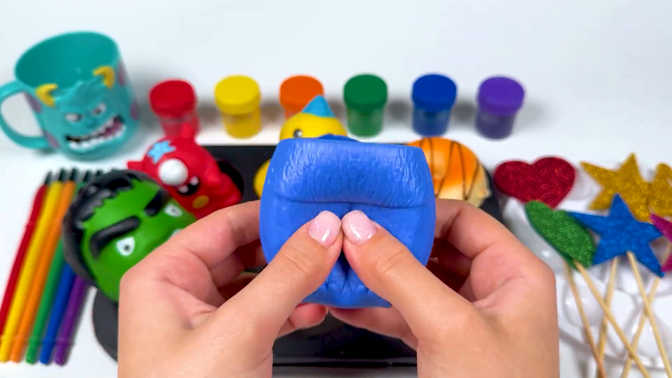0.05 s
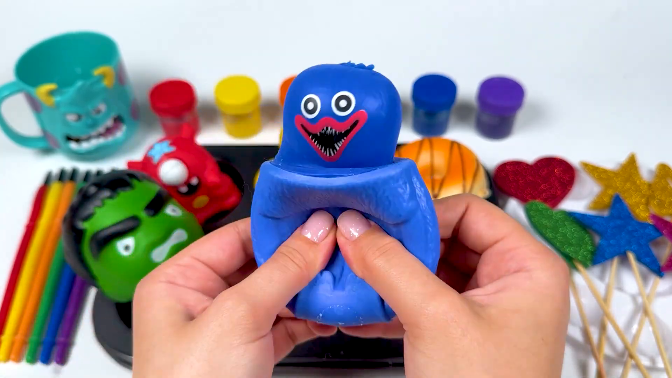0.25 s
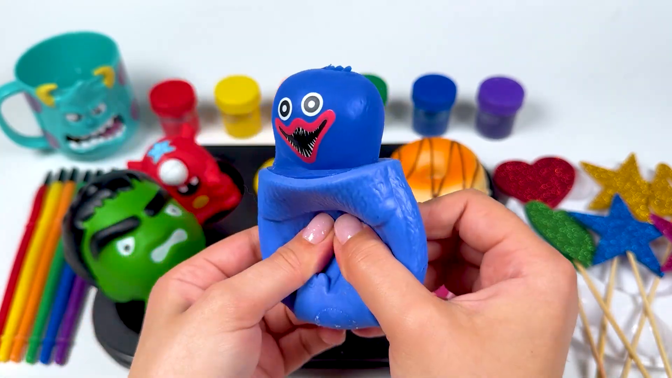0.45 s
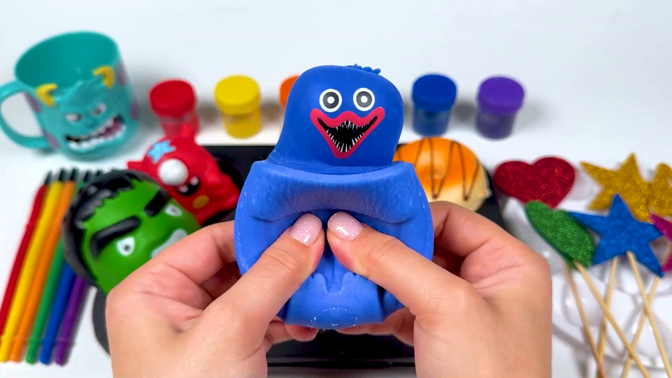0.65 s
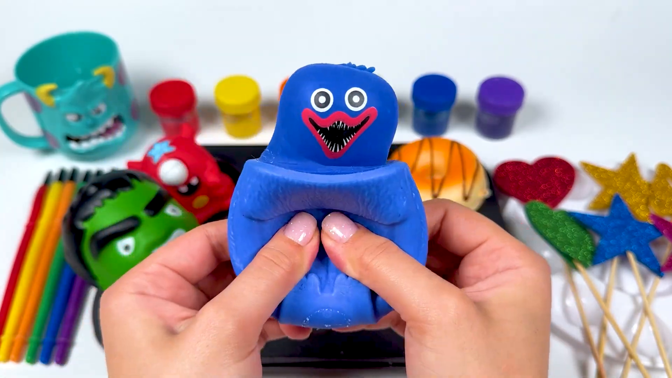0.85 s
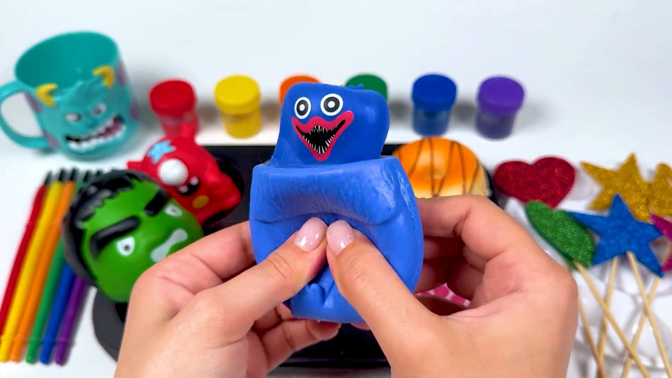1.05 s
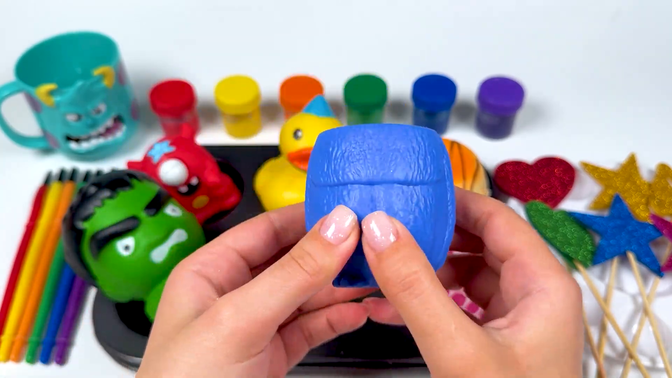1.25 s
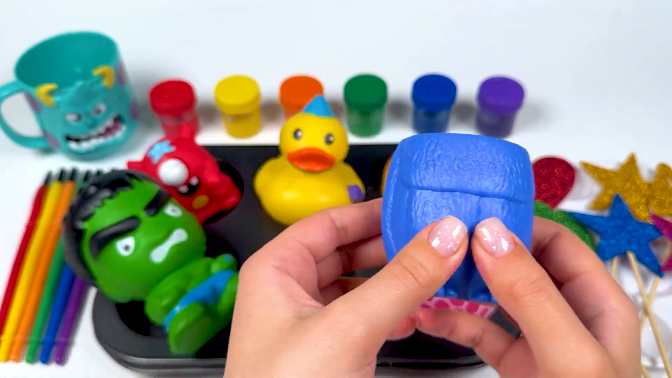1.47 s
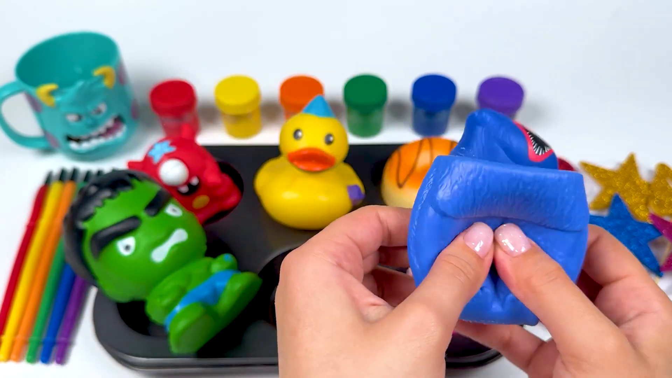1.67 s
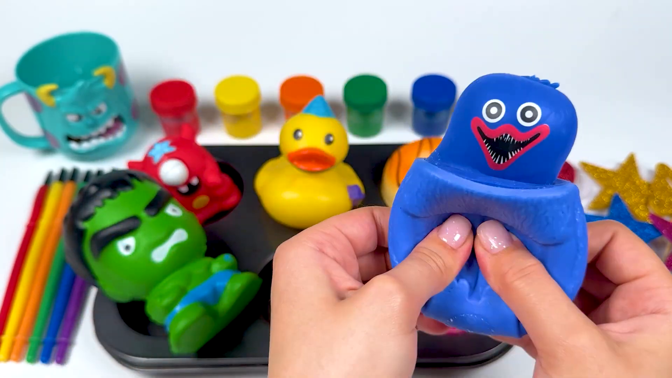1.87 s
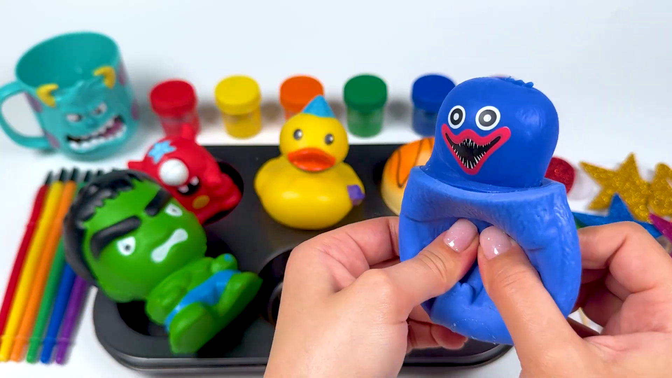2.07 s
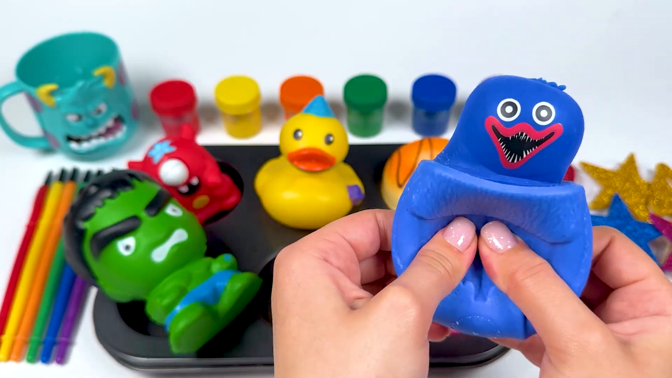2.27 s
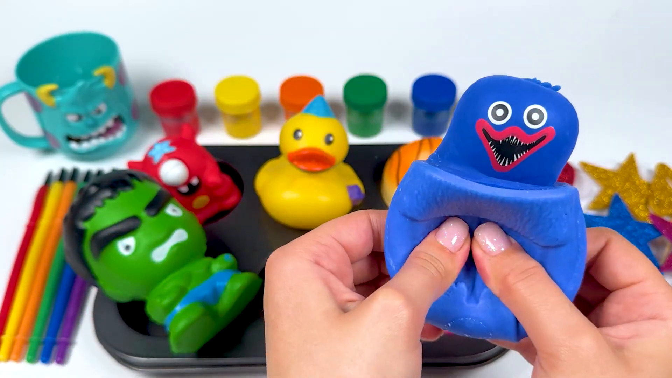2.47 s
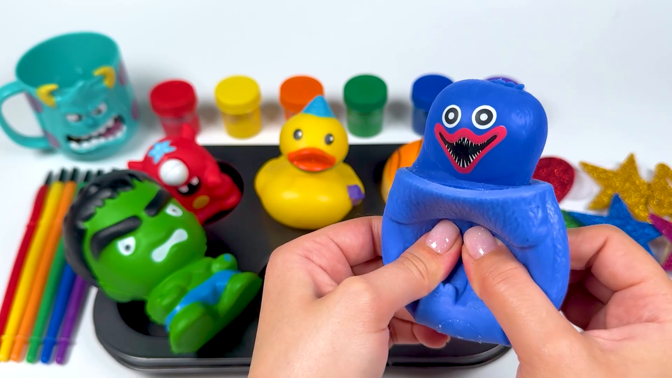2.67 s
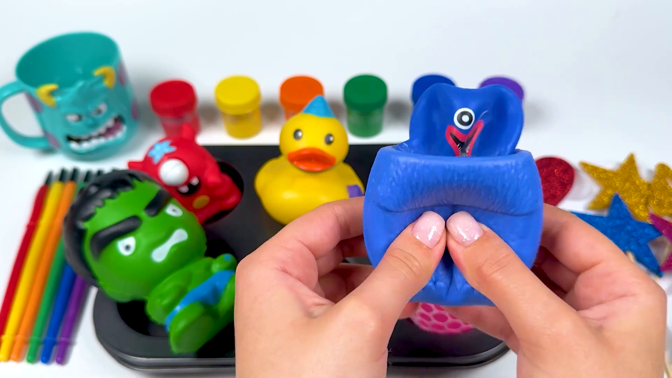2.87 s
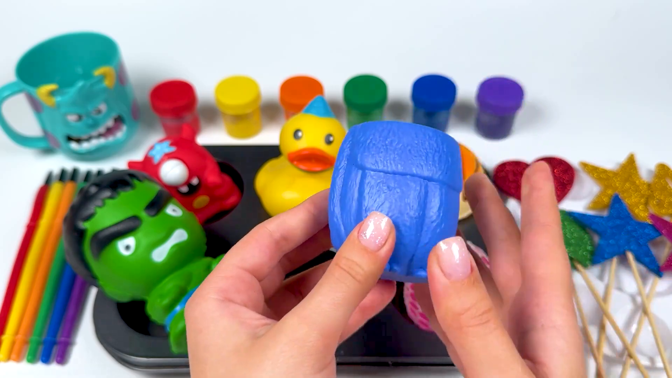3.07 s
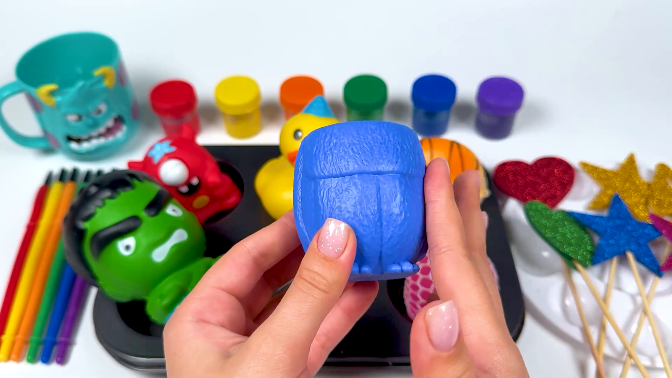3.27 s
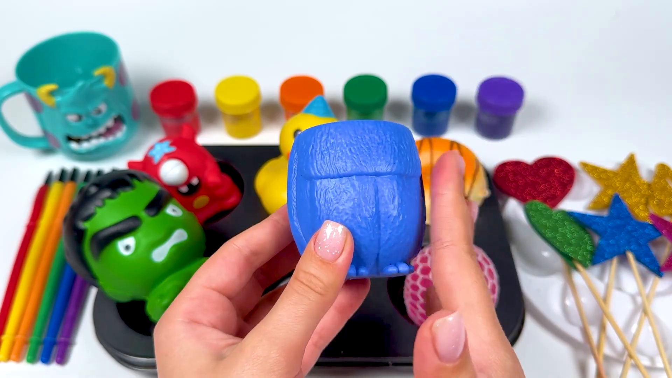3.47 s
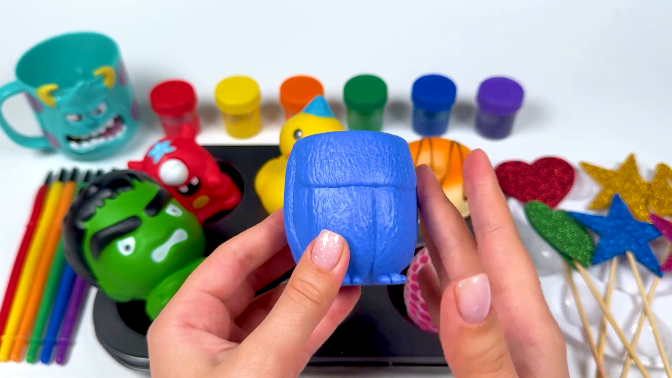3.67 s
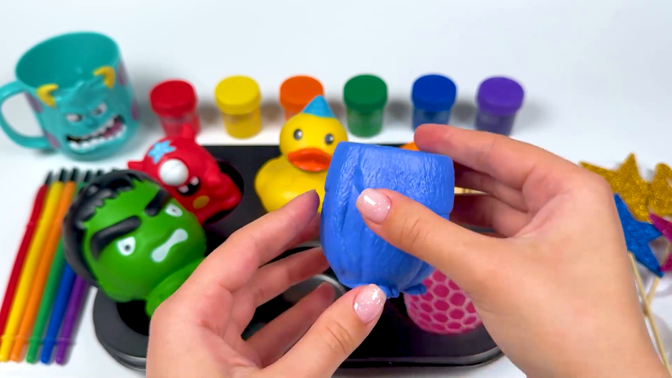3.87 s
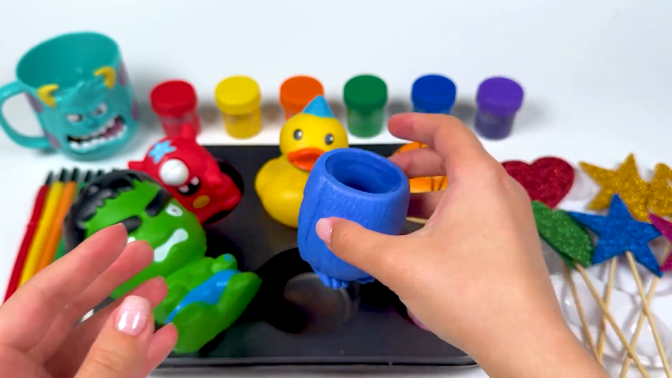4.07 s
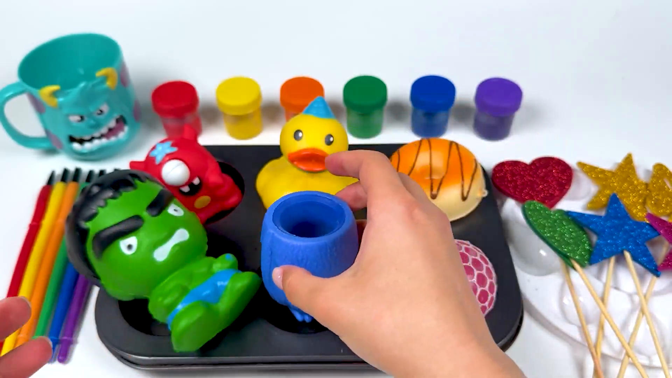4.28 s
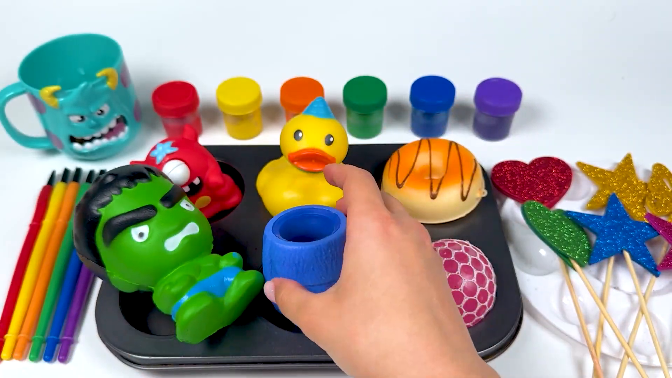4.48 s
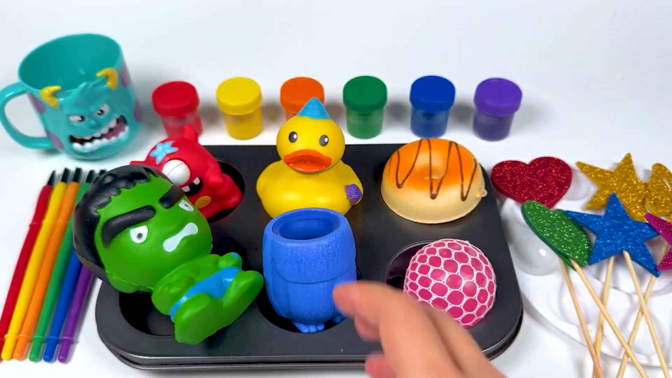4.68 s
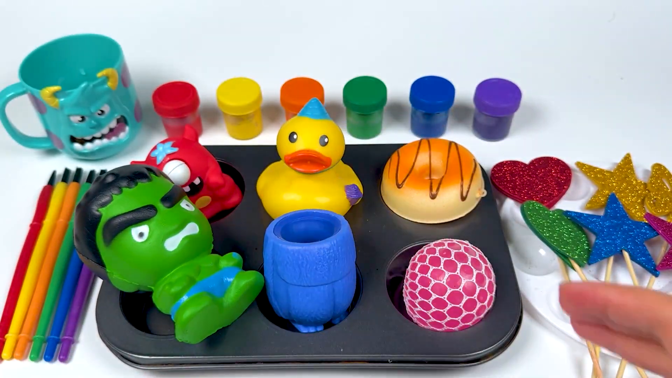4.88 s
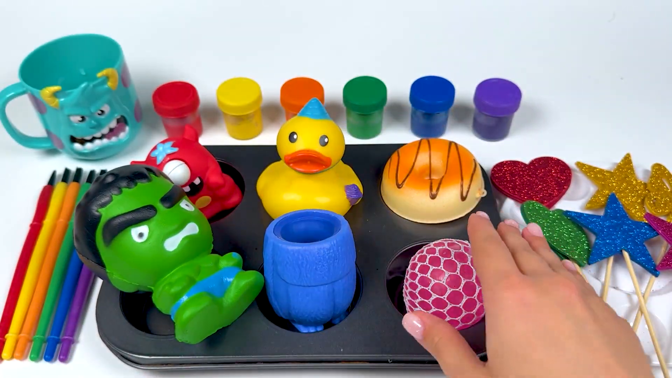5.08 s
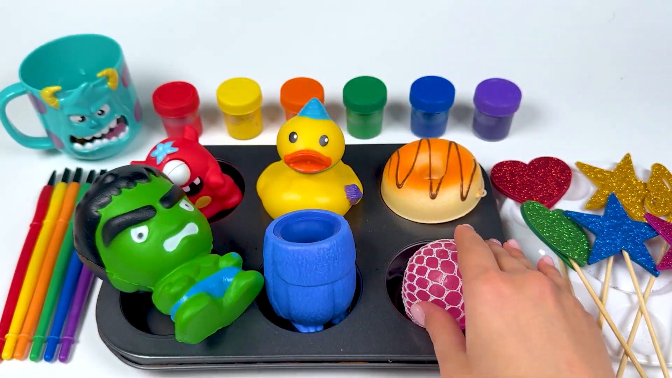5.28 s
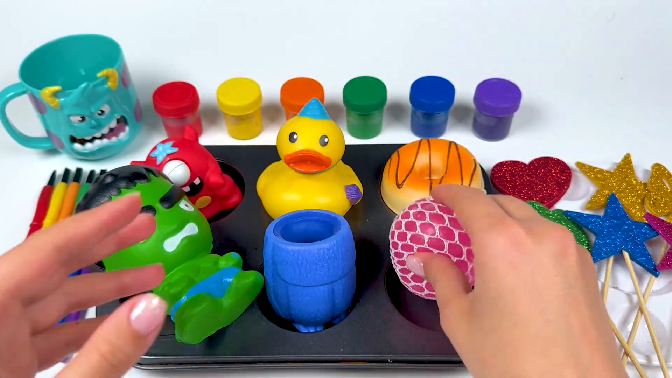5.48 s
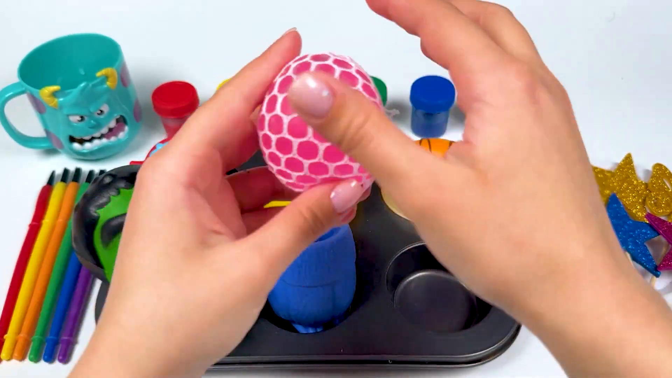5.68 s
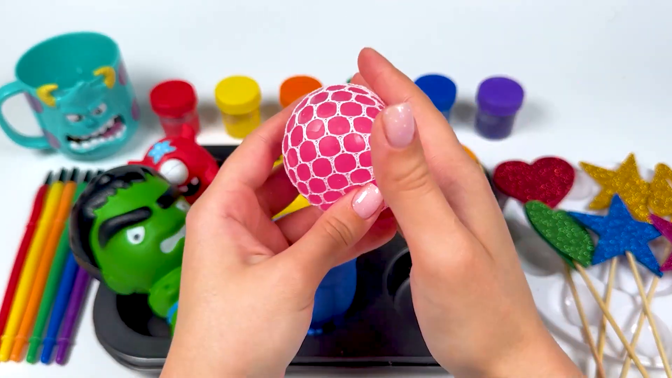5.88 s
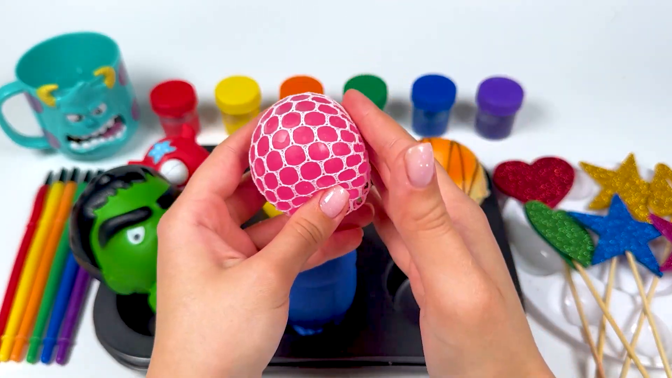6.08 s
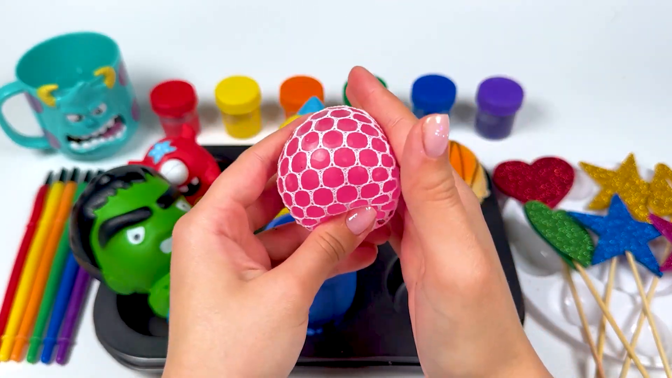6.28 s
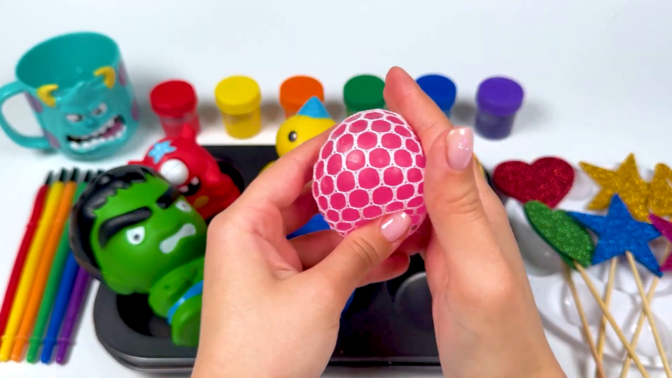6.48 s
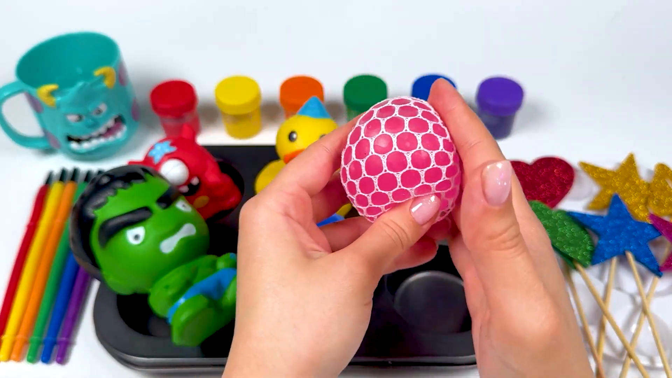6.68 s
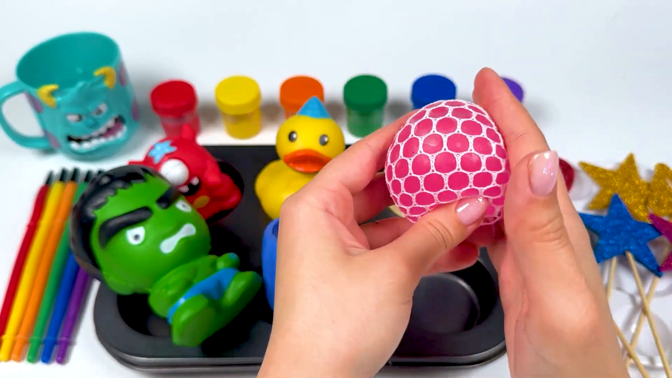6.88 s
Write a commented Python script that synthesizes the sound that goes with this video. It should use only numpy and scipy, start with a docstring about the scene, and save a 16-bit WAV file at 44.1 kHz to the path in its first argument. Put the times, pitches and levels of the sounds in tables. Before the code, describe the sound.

Close stereo microphone, short room tail and faint low room noise. Two loud rubbery pops, each a quick cluster of sagging hollow tones and sharp cracks, alternate with softer squelchy slips inward. Dull faint bumps and small hollow taps come between and after. Finally, skin brushes a netted ball to and fro in quickening, airy, crisp swishes.

```python
"""A hollow rubber toy, squeezed by two hands close to the microphone in a small room: its head pops out
and slips back, twice. Rubber rubs through the neck in stick-slip, freed air pockets ring with a sagging
pitch, and the skin cracks taut. Taps ring as the toy is turned and set down on a tray, with soft bumps.
Last, fingers stroke a ball in a mesh net: a bright hiss in quickening strokes. Around it lie a short
room tail, a bright echo from the tray and low room noise."""
import sys
import numpy as np
from scipy import signal
from scipy.fft import rfft, irfft
from scipy.io import wavfile

SR = 44100
rng = np.random.default_rng(int(sys.argv[2]) if len(sys.argv) > 2 else 0)


def store_pcm(level_fs):
    """Save levels as 16-bit WAV."""
    pcm = np.round(np.clip(level_fs, -1, 1) * 32767).astype(np.int16)
    wavfile.write(sys.argv[1], SR, np.atleast_2d(pcm).T)


N = 306054
TIME = np.arange(N) / SR


def undb(db):
    """Decibels to gain."""
    return 10 ** (np.asarray(db) / 20)


def unit(x):
    """Scale to rms 1."""
    return x / np.sqrt(np.mean(x ** 2))


def along(points, hz):
    """Read (frequency [Hz], value) points on a log-frequency axis."""
    f, value = np.transpose(points)
    return np.interp(np.log(np.maximum(hz, 1)), np.log(f), value)


def colour(x, points, size=4096):
    """Causal, minimum-phase filter with the given (frequency [Hz], level [dB]) response."""
    log_gain = np.log(undb(along(points, np.fft.rfftfreq(size, 1 / SR))))
    cepstrum = irfft(log_gain)
    # folding the cepstrum onto positive time makes the response causal
    cepstrum[1:size // 2] *= 2
    cepstrum[size // 2 + 1:] = 0
    response = irfft(np.exp(rfft(cepstrum)))
    if x.ndim == 2:
        response = response[None]
    return signal.fftconvolve(x, response, axes=-1)[..., :x.shape[-1]]


def bandpass(x, order, low_hz, high_hz):
    """Butterworth band-pass."""
    return signal.sosfilt(signal.butter(order, [low_hz, high_hz], "band", fs=SR, output="sos"), x)


def add(track, s, sound):
    """Mix a sound in at time s."""
    i = max(int(s * SR), 0)
    part = sound[:max(N - i, 0)]
    track[i:i + len(part)] += part


def diffuse(count):
    """Noise arriving from all sides at two spaced microphone ports: alike in the bass only."""
    likeness = 0.92 * np.sinc(np.fft.rfftfreq(count, 1 / SR) / 680)
    shares = np.sqrt([(1 + likeness) / 2, (1 - likeness) / 2])
    mid, side = rfft(rng.standard_normal((2, count))) * shares
    return irfft([mid + side, mid - side], count)


def ring(hz, swell_ms, sag=0., sag_s=1.):
    """A heavily damped resonance that swells and fades; its pitch sags by a share, from above hz to below."""
    t = TIME[:SR // 2]
    age = 1000 * t / swell_ms
    pitch = hz * (1 + sag * (np.exp(-t / sag_s) - .5))
    return age * np.exp(1 - age) * np.sin(2 * np.pi * np.cumsum(pitch) / SR)


def burst(points, decay_s):
    """A very short crackle of contact, peak 1."""
    t = TIME[:SR // 20]
    y = colour(rng.standard_normal(len(t)) * np.exp(-t / decay_s), points)
    return y / np.abs(y).max()


def crack(points):
    """One sharp release with a little crackle, peak 1; treble crosses the stretched skin ahead of bass."""
    t = TIME[:SR // 20]
    hz = np.fft.rfftfreq(len(t), 1 / SR)
    delay_s = .0012 * (1 - hz / hz[-1])
    phase = 2 * np.pi * np.cumsum(delay_s) * hz[1]
    release = irfft(np.exp(-1j * phase), len(t))
    crackle = undb(-20) * rng.standard_normal(len(t)) * np.exp(-t / .0008)
    y = colour(release + crackle, points)
    return y / np.abs(y).max()


def slips(rate, spread_db):
    """Stick-slip: a dense random train of tiny releases (rate per second) of unequal size, rms 1."""
    happens = rng.random(N) < rate / SR
    sizes = undb(spread_db * np.clip(rng.standard_normal(N), -2, 2))
    return unit(happens * rng.choice([-1, 1], N) * sizes)


def gesture(start, end, shape, lean):
    """Speed of a sliding contact, from rest and back to rest; a lean over 1 puts the peak late."""
    progress = np.clip((TIME - start) / max(end - start, 1 / SR), 0, 1) ** lean
    return (4 * progress * (1 - progress)) ** shape


# spectrum of the room noise: (frequency [Hz], level [dB])
AIR_SPECTRUM = [(25, -9.5), (45, -2.5), (100, -8), (200, -7.5), (310, -12), (420, -20.5), (600, -20.5),
                (900, -30), (2500, -32), (4000, -43.5), (15000, -49.5)]
# room noise and the faint stir of hands: (time [s], level [dB])
AIR_LEVEL = [(0, -67.5), (2.5, -69.5), (3.5, -66.5), (4.4, -67), (5.5, -62.5), (6.9, -61)]


def air():
    """Low diffuse noise of the room and of stirring hands, at a slowly drifting level."""
    return unit(colour(diffuse(N), AIR_SPECTRUM)) * undb(np.interp(TIME, *np.transpose(AIR_LEVEL)))


# fingers and tray tap the toy: (time [s], level [dB], main ring [Hz], tick peak re level [dB])
TAPS = [(0.061, -56.5, 840, 0), (1.029, -59, 427, 3.5), (1.62, -66.5, 424, 8), (2.839, -42, 433, 2),
        (2.855, -50, 500, 6), (3.303, -36, 486, -5), (3.522, -54, 451.7, -5), (3.61, -49.5, 532, -6.5),
        (3.851, -58.5, 590, -2), (4.562, -46.5, 965, -7), (4.628, -54.5, 910, -15)]
# spectrum of a tap's soft tick: (frequency [Hz], level [dB])
TICK_SPECTRUM = [(300, -9), (900, 9), (1900, 2.5), (3000, -11), (5000, -25), (8000, -29.5), (16000, -45.5)]
# spectrum of a sharp crack, for taps and for the snapping skin: (frequency [Hz], level [dB])
CRACK_SPECTRUM = [(900, -2.5), (1700, 5), (2700, 2.5), (4200, -17.5), (6000, -12), (8200, -2.5), (11300, 4),
                  (15000, -4)]


def taps():
    """A soft tick of contact with a bright edge, and a hollow ring of a few cycles."""
    out = np.zeros(N)
    for s, db, hz, tick_db in TAPS:
        add(out, s, undb(db - 2.0) * ring(hz, swell_ms=1300 / hz))
        tick = burst(TICK_SPECTRUM, .0028) + undb(-17.5) * crack(CRACK_SPECTRUM)
        add(out, s, undb(db + tick_db) * tick)
    return out


def tray_echo(x):
    """The tray throws the upper middle back, by a slightly different path to each microphone port."""
    bright = bandpass(x, 1, 1800, 5500)
    lags = [int(ms * SR / 1000) for ms in (.42, .24)]
    return undb(-4) * np.array([np.pad(bright, (lag, 0))[:N] for lag in lags])


# how long the room rings on: (frequency [Hz], time to fall by 60 dB [s])
ROOM_T60 = [(100, 0.41), (400, 0.27), (1000, 0.37), (3000, 0.26), (8000, 0.22), (15000, 0.18)]
# uneven colour of the room tail: (frequency [Hz], level [dB])
ROOM_COLOUR = [(60, -3.5), (130, 4), (185, 1.5), (235, -3), (285, 3.5), (330, -4.5), (400, -1.5),
               (560, 2.5), (800, 0.5), (1200, -8), (2700, -2), (4400, 4), (8000, -0.5), (15000, -11.5)]


def room(x):
    """A short diffuse tail of reflections, uneven in the bass and shortest at the very top."""
    t = TIME[:SR // 2]
    hz, noise = np.fft.rfftfreq(len(t), 1 / SR), rfft(diffuse(len(t)))
    centres, t60s = np.transpose(ROOM_T60)
    tail = 0
    for share, t60 in zip(np.eye(len(t60s)), t60s):
        band = irfft(noise * along(np.c_[centres, share], hz), len(t))
        tail = tail + band * np.exp(-np.log(1000) * t / t60)
    onset = np.clip((t - .0025) / 0.0013, 0, 1)
    tail = undb(-35) * colour(tail * onset, ROOM_COLOUR)
    return signal.fftconvolve(x[None], tail, axes=1)[:, :N]


# the head pops out through the neck: (release time [s], creep before it [s], pocket level [dB],
# first pocket [Hz], belly level [dB], rub level [dB], squeak level [dB], snap level [dB])
POPS_OUT = [(.1545, .051, -10, 435, -21, -34, -42, -7), (1.7294, .05, -9.5, 400, -20, -38.5, -34, -10.5)]
# the head slips back in: (release time [s], creep before it [s], pocket level [dB],
# first pocket [Hz], belly level [dB], rub level [dB], squeak level [dB])
SLIPS_IN = [(1.2197, .075, -23, 480, -34.5, -42.5, -56), (2.9748, 0.048, -17, 541, -19, -30, -43.5)]
# the toy rubs over fingers and onto the tray:
# (start time [s], end time [s], groan level [dB], squeak [Hz], squeak level [dB])
RUBS = [(2.835, 2.916, -61.5, 1870, -65), (3.848, 3.908, -67, 1380, -80),
        (4.547, 4.607, -59.5, 1230, -65.5), (4.675, 4.708, -72, 3850, -82)]
# friction has a slow creep and a quick rush around the release
# span: (starts early by [s], ends after release by [s], lean: over 1 peaks late)
OUT_CREEP_SPAN, OUT_RUSH_SPAN = (.018, .012, 1.5), (.013, .012, .95)
IN_CREEP_SPAN, IN_RUSH_SPAN = (.024, -.006, 1.45), (.019, .008, 1.1)
# tone: (groan re rub [dB], squelch re rub [dB], squeak [Hz])
OUT_CREEP_TONE, OUT_RUSH_TONE = (-1.5, -27.5, 1300), (.5, -9, 1540)
IN_CREEP_TONE, IN_RUSH_TONE = (-1, -11, 1000), (0.5, -9, 2407)
CREEP_RUB_DB, CREEP_SQUEAK_DB = -43, -53  # alike on every pass
RUB_SQUELCH_DB = -14.5  # re groan


def slide_stage(start, release, rub_db, squeak_db, span, tone):
    """One stage of friction around a release, as a row of slides()."""
    early_s, after_s, lean = span
    groan_db, squelch_db, hz = tone
    return start - early_s, release + after_s, rub_db + groan_db, rub_db + squelch_db, hz, squeak_db, lean


def slides():
    """Light rubs, creeps and rushes: (start [s], end [s], groan [dB], squelch [dB], squeak [Hz], [dB], lean)."""
    rows = [(start, end, db, db + RUB_SQUELCH_DB, hz, squeak_db, 1)
            for start, end, db, hz, squeak_db in RUBS]
    outward = POPS_OUT, (OUT_CREEP_SPAN, OUT_CREEP_TONE), (OUT_RUSH_SPAN, OUT_RUSH_TONE)
    inward = SLIPS_IN, (IN_CREEP_SPAN, IN_CREEP_TONE), (IN_RUSH_SPAN, IN_RUSH_TONE)
    for passes, creep, rush in (outward, inward):
        for s, creep_s, _, _, _, rub_db, squeak_db, *_ in passes:
            rows.append(slide_stage(s - creep_s, s, CREEP_RUB_DB, CREEP_SQUEAK_DB, *creep))
            rows.append(slide_stage(s, s, rub_db, squeak_db, *rush))
    return rows


# spectrum of the groaning body, also of the flapping wall: (frequency [Hz], level [dB])
GROAN_SPECTRUM = [(90, -11), (200, 1), (480, 0.5), (750, -5.5), (1150, -12), (1800, -19), (3000, -37.5),
                  (6000, -56)]
# spectrum of the fine squelch: (frequency [Hz], level [dB])
SQUELCH_SPECTRUM = [(500, -24), (1000, -2.5), (1600, 3.5), (2700, -2.5), (4000, -14), (6000, -18.5),
                    (11000, -13), (15500, -17.5)]


def drags():
    """Slow slips make the body groan; fine ones squelch and ring the stretched patch of skin."""
    groan = unit(colour(slips(1500, 3), GROAN_SPECTRUM))
    fine = slips(3500, 5)
    squelch = unit(colour(fine, SQUELCH_SPECTRUM))
    out = np.zeros(N)
    for start, end, groan_db, squelch_db, hz, squeak_db, lean in slides():
        squeak = unit(bandpass(fine, 2, hz / 1.13, hz * 1.13))
        friction = undb(groan_db) * groan + undb(squelch_db) * squelch + undb(squeak_db) * squeak
        out += gesture(start, end, 0.91, lean) * friction
    return out


JERK_S = .0083  # gap between the pockets of one release
POCKET_SWELL_MS, SWELL_STEP_MS = 1.7, .45  # first pocket; each later one is slower by the step


def jerks(s, db, hz, drop, fade_db, count=3):
    """Pockets freed in turn by one release: (time [s], peak [dB], pitch [Hz], swell [ms])."""
    rows = []
    for k in range(count):
        pitch = hz * (1 - drop * (k / (count - 1)) ** 2)
        rows.append((s + JERK_S * k, db - k * fade_db, pitch, POCKET_SWELL_MS + k * SWELL_STEP_MS))
    return rows


# sticky skin lets go of the neck before the head slips in:
# (time [s], ring level [dB], crack level [dB], freed air level [dB])
UNSTICKS = [(1.122, -65, -50, -75), (1.132, -37, -42, -48), (1.147, -57, -61, -38.5),
            (1.173, -37, -38.5, -34.5), (2.9239, -39, -40, -32)]
# share of pitch lost by the last jerk; level lost per jerk (negative: gained)
OUT_PITCH_DROP, OUT_FADE_DB = 0.35, 4.5
IN_PITCH_DROP, IN_FADE_DB = .68, -1.02
# as the head creeps out, a low pocket gives way first and a higher one this share of the way through
CREEP_DB, CREEP_SWELL_MS, CREEP_LOW_HZ, CREEP_HIGH_HZ, CREEP_SHARE = -38, 6.5, 200, 480, .38
BELLY_HZ, BELLY_LAG_S, BELLY_SWELL_MS = 150, .005, 2  # the hollow body answers the release
UNSTICK_AIR_HZ = 424  # first of the two pockets freed


def pockets():
    """All air that rings at the neck and in the belly: (time [s], level [dB], pitch [Hz], swell [ms])."""
    rows = []
    outward = POPS_OUT, OUT_PITCH_DROP, OUT_FADE_DB
    inward = SLIPS_IN, IN_PITCH_DROP, IN_FADE_DB
    for passes, drop, fade_db in (outward, inward):
        for s, _, db, hz, belly_db, *_ in passes:
            rows += jerks(s, db, hz, drop, fade_db)
            rows.append((s + BELLY_LAG_S, belly_db, BELLY_HZ, BELLY_SWELL_MS))
    for s, creep_s, *_ in POPS_OUT:
        rows.append((s - creep_s, CREEP_DB, CREEP_LOW_HZ, CREEP_SWELL_MS))
        rows.append((s - creep_s * (1 - CREEP_SHARE), CREEP_DB, CREEP_HIGH_HZ, CREEP_SWELL_MS))
    for s, _, _, air_db in UNSTICKS:
        rows += jerks(s, air_db, UNSTICK_AIR_HZ, drop=.57, fade_db=-0.2, count=2)
    return rows


SAG, SAG_S = 0.36, 0.0066  # share by which a pocket's pitch falls, and its time constant


def pops():
    """Each air pocket rings; the slack wall adds a brief overtone, a faint thud and a rough flap."""
    out = np.zeros(N)
    for s, db, hz, swell_ms in pockets():
        pocket = ring(hz, swell_ms, SAG, SAG_S)
        overtone = ring(2.1 * hz, .6 * swell_ms, SAG, SAG_S)
        thud = ring(90, 6.3)
        add(out, s, undb(db) * (pocket + undb(-18) * overtone + undb(-24.5) * thud))
        add(out, s, undb(db - 11.5) * burst(GROAN_SPECTRUM, .005))
    return out


# going out, the skin cracks three times and hardest at the middle one, where it comes taut
SNAP_HZ, SNAP_LAG_S, SNAP_GAP_S = 1080, 0.0076, .0096
SIDE_SNAP_DB, SNAP_CRACK_DB = -16.5, -1.5  # outer cracks re the middle one; crack re ring
UNSTICK_HZ = 1074  # ring of the skin


def skin_cracks():
    """Small unstickings, and three cracks to each pop: (time [s], ring [dB], pitch [Hz], crack [dB])."""
    rows = [(s, ring_db, UNSTICK_HZ, crack_db) for s, ring_db, crack_db, _ in UNSTICKS]
    for s, *_, snap_db in POPS_OUT:
        for k in -1, 0, 1:
            db = snap_db + abs(k) * SIDE_SNAP_DB
            rows.append((s + SNAP_LAG_S + k * SNAP_GAP_S, db, SNAP_HZ, db + SNAP_CRACK_DB))
    return rows


def snaps():
    """The tightening skin cracks and rings in two modes for a few milliseconds."""
    out = np.zeros(N)
    for s, ring_db, hz, crack_db in skin_cracks():
        add(out, s, undb(ring_db) * (ring(hz, 0.69) + undb(-9.5) * ring(1.55 * hz, 0.88)))
        add(out, s, undb(crack_db) * crack(CRACK_SPECTRUM))
    return out


# soft bumps of hands and rubber: (time [s], level [dB], pitch [Hz])
BUMPS = [(.498, -42.5, 80), (.565, -52, 86.4), (0.646, -43.5, 77), (0.713, -43.5, 78.7), (0.766, -52, 69.4),
         (4.99, -47.5, 49), (5.081, -51, 47.6), (6.07, -55.5, 46.5), (6.159, -47, 42.6)]
BUMP_SWELL_CYCLES, BUMP_OVERTONE, BUMP_OVERTONE_DB = 1.08, 1.76, -8  # overtone as a ratio of the pitch


def bumps():
    """Dull low thuds of two sagging modes, while the toy is held and the ball is picked up."""
    out = np.zeros(N)
    for s, db, hz in BUMPS:
        for mode_hz, mode_db in (hz, db), (hz * BUMP_OVERTONE, db + BUMP_OVERTONE_DB):
            swell_ms = 1000 * BUMP_SWELL_CYCLES / mode_hz
            add(out, s, undb(mode_db) * ring(mode_hz, swell_ms, 0.3, 0.01))
    return out


# fingers take hold of the net: (start time [s], end time [s], level [dB])
TOUCHES = [(5.38, 5.5, -74), (5.59, 5.85, -73), (5.72, 5.768, -55.5), (5.82, 5.96, -66.5)]
# strokes as the ball is rolled to and fro: (time [s], level [dB])
ROLL_LEVEL = [(6.08, -59.5), (6.22, -47), (6.38, -47.5), (6.52, -49.5), (6.66, -46.5), (6.94, -48)]
# each stroke is a little quicker than the last
ROLL_START_S, ROLL_PERIOD_S, ROLL_QUICKEN_S, STROKE_OVERLAP_S = 5.997, 0.15385, 0.0038, 0.0035


def strokes(count=7):
    """First touches, then the quickening strokes of the roll: (start [s], end [s], level [dB])."""
    lengths = ROLL_PERIOD_S - ROLL_QUICKEN_S * np.arange(count)
    ends = ROLL_START_S + np.cumsum(lengths)
    levels = np.interp(ends - lengths / 2, *np.transpose(ROLL_LEVEL))
    return list(TOUCHES) + list(zip(ends - lengths, ends + STROKE_OVERLAP_S, levels))


# spectrum of skin on threads: (frequency [Hz], level [dB])
NET_SPECTRUM = [(1250, -27.5), (1500, -22), (1700, -4.5), (2000, -19.5), (2400, -14.5), (2900, -6.5),
                (3800, -23), (5700, -13), (7700, -6.5), (10500, 4), (12800, 0), (15600, 3)]
NET_CATCH_HZ, NET_CATCH_DB = 173, 2.2  # knots catch on the skin: how often, and how unevenly


def net():
    """Skin brushing over threads: a fine bright hiss that follows each stroke."""
    speed = sum(undb(db) * gesture(start, end, 2.83, lean=0.93) for start, end, db in strokes())
    threads = slips(14000, 5)
    knots = np.interp(TIME * NET_CATCH_HZ, np.arange(N), rng.standard_normal(N))
    return speed * undb(NET_CATCH_DB * knots) * unit(colour(threads, NET_SPECTRUM))


def scene():
    """Toy and ball between the hands, straight ahead of the microphone; the room around them."""
    contact = pops() + snaps() + drags() + taps() + net()
    # so small a body radiates little deep bass
    direct = signal.sosfilt(signal.butter(2, 50, "high", fs=SR, output="sos"), contact)
    return direct + tray_echo(direct) + room(direct) + bumps() + air()


TWIST_HZ, TWIST_S = 8000, .000328  # the left channel is late by this much above this frequency
TOP_HZ = 15800


def record(dry):
    """The left channel's treble arrives a little late, which widens it; the very top is cut."""
    turns = TWIST_S * np.maximum(np.fft.rfftfreq(N, 1 / SR) - TWIST_HZ, 0)  # phase lag in cycles
    left = irfft(rfft(dry[0]) * np.exp(-2j * np.pi * turns), N)
    top_cut = signal.ellip(12, .2, 70, TOP_HZ, fs=SR, output="sos")
    return signal.sosfilt(top_cut, np.array([left, dry[1]]))


dry = scene()
out = record(dry)
store_pcm(out)
```